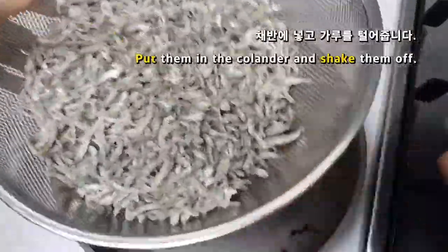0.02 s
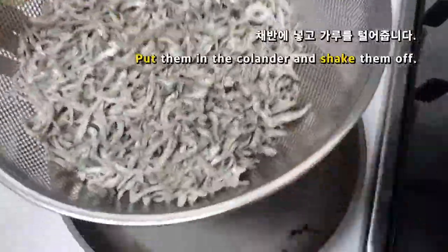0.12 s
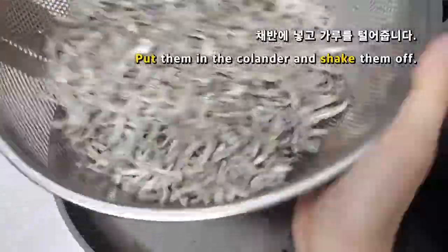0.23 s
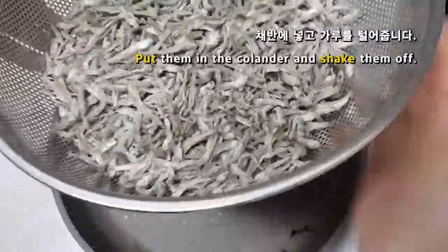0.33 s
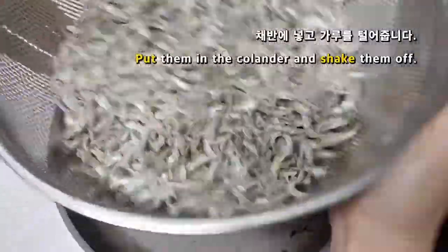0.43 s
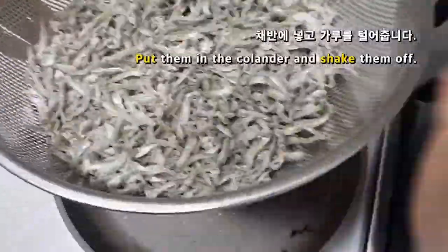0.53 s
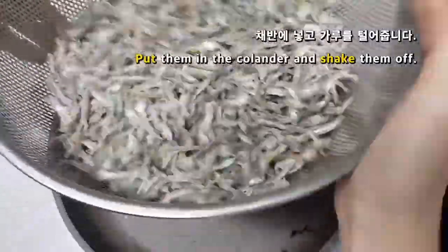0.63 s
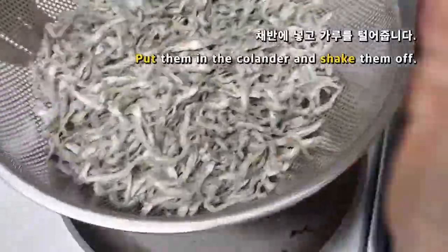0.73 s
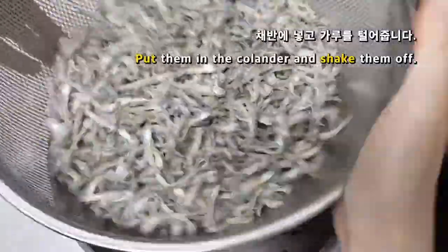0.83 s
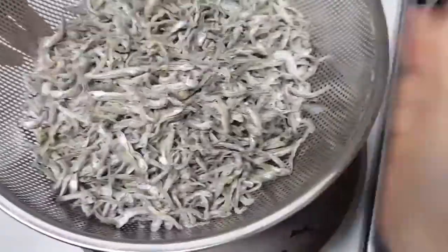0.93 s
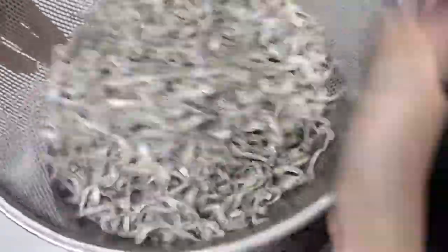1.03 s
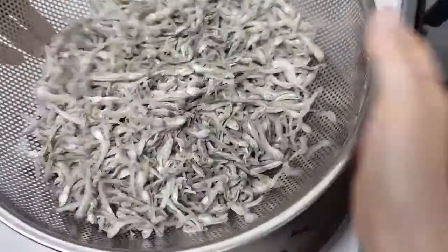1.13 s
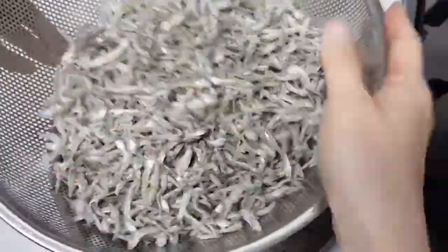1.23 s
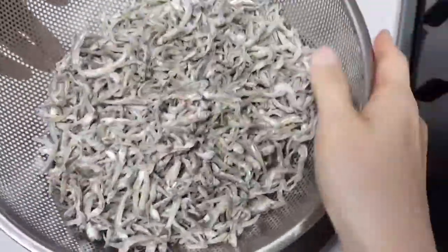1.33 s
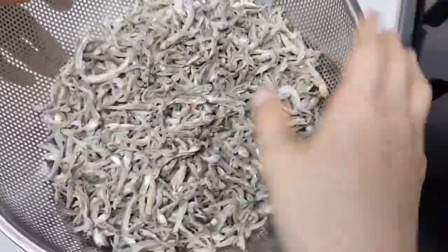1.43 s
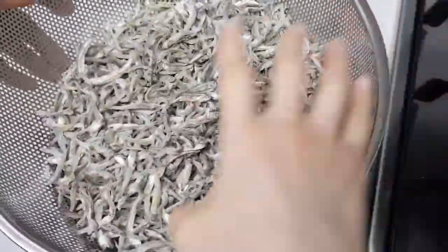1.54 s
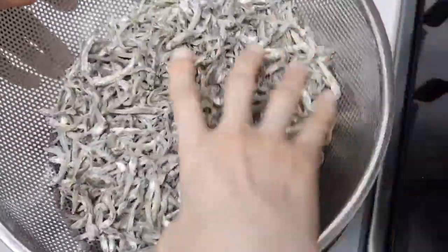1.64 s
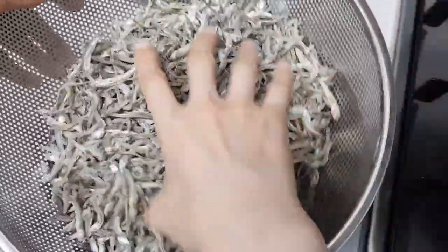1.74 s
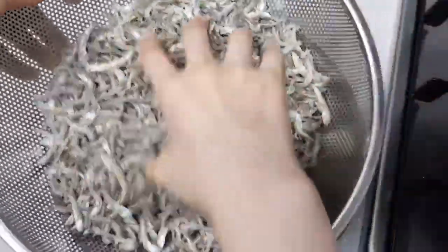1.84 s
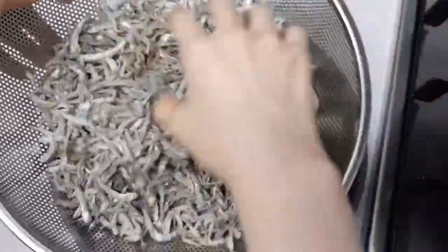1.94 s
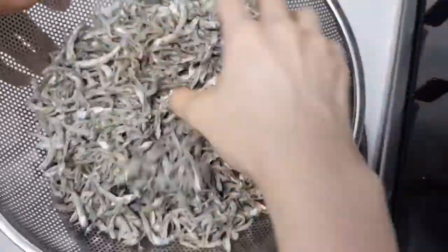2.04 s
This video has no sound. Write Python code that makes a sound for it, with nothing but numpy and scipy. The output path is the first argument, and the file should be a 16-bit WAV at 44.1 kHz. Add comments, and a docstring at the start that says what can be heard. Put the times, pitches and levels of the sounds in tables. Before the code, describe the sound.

Small dried fish are tossed six times in a wire strainer, each a sharp dry crunch with a hollow knock and pattering; the rim clinks a steel bowl, then a hand rustles the heap, close in a kitchen.

```python
"""Small dried fish are tossed six times in a steel mesh strainer, close to a two-port microphone in a kitchen.
Each toss jolts the strainer into a hollow knock, slams the heap into the mesh as dense clicks that ring
the wires, and lets loose fish patter back in dying showers. The rim rings a steel bowl as the strainer
settles, then a hand stirs the heap with a patchy rustle. An appliance rumbles and hums behind.
Clicks and noise are coloured by spectra, struck steel is damped modes, and early echoes and a room tail follow."""
import sys
import numpy as np
from scipy import signal
from scipy.fft import rfft, irfft
from scipy.io import wavfile
from scipy.ndimage import uniform_filter1d

SR = 44100
rng = np.random.default_rng(int(sys.argv[2]) if len(sys.argv) > 2 else 0)


def digitize_waveform(pressure):
    """Quantize a signal to 16-bit integers and store it at the path in sys.argv[1].

    Rows of a 2-D input are taken as channels; values are limited to [-1, 1].
    """
    field = np.atleast_2d(pressure).T
    bounded = np.clip(field, -1, 1)
    quanta = np.round(bounded * 32767).astype(np.int16)
    wavfile.write(sys.argv[1], SR, quanta)


N = 92610
T = np.arange(N) / SR  # s
HZ = np.fft.rfftfreq(N, 1 / SR)

# Levels of the events and the rumble are those ahead of the output gain and the port balance.

# appliance rumble, spectrum shape: frequency_hz, density_db_per_hz
RUMBLE_SPECTRUM = [(20, -12), (50, -4), (75, 1), (115, -2), (160, -17), (190, -11), (260, -20), (380, -20),
                   (550, -28), (740, -22), (1100, -32), (2500, -39), (8000, -47), (11000, -40),
                   (15500, -38), (16500, -60)]
RUMBLE_DB = -64.7

# slow swell added to the hum level: time_s, change_db
HUM_SWELL = [(0, -5), (.9, -1), (1.4, .5), (2.1, .5)]
HUM_HZ, HUM_WAVER_HZ = 785.5, 1.5  # mean pitch and rms wander
HUM_DB, HUM_FLUTTER_DB = -68.3, 1.4  # base level at the left port and rms flutter
HUM_RIGHT_DB = -17  # right port relative to left

# base level of the heap as it shifts and is stirred: time_s, level_db
STIR_LEVEL = [(0, -82), (.18, -80), (.3, -63.5), (.6, -65), (.8, -69), (1.0, -67), (1.2, -63), (1.4, -66),
              (1.46, -72), (1.52, -67), (1.58, -71), (1.66, -62.5), (1.71, -63), (1.81, -55.5),
              (1.87, -56.5), (1.96, -62), (2.03, -66), (2.1, -76)]
# rustle of the heap, spectrum shape: frequency_hz, density_db_per_hz
STIR_SPECTRUM = [(300, -8), (1200, -10), (2700, -15), (3600, -4), (5500, -4), (7400, -2), (8800, -8),
                 (10200, -1), (12500, 2), (15500, -1), (16100, -22)]
STIR_PATCHY_DB = 1.3  # rms unevenness
# a hand rubs on the rim or presses on the heap: peak_s, level_db, rise_s, fall_to_minus_60_db_s
RUBS = [(.29, -62, .04, .5), (.5, -60.5, .04, .5), (.775, -63.5, .03, .3), (1.778, -63, .025, .5)]
# dull rub of the palm, spectrum shape: frequency_hz, density_db_per_hz
PALM_SPECTRUM = [(100, -6), (210, -2), (330, 0), (550, -4), (800, -3), (1300, -3), (1900, -13), (4000, -34)]

# soft bumps of the hands on the strainer: peak_s, level_db, rise_s, fall_to_minus_60_db_s
BUMPS = [(.02, -63, .02, .5), (.31, -56.5, .02, .45), (.6, -62, .03, .3), (.76, -60, .02, .4),
         (1.11, -54.5, .025, .35), (1.29, -58, .03, .3), (1.53, -64, .02, .6)]
# bass of bumps and jolts, spectrum shape: frequency_hz, density_db_per_hz
BASS_SPECTRUM = [(20, -15), (45, -6), (70, 0), (105, -2), (160, -7), (205, -11), (250, -6), (300, -16),
                 (450, -28), (2000, -70)]

# fingertips tap the wires: peak_s, level_db
TAPS = [(.08, -70), (1.286, -39.5), (1.329, -53), (1.479, -46), (2.008, -59)]
# scratch of a fingertip, spectrum shape: frequency_hz, density_db_per_hz
TAP_SPECTRUM = [(1500, -28), (2500, -19), (3100, -7), (4000, -3), (4650, 7), (5600, -4), (7300, 2),
                (8700, -8), (10500, -1), (15500, -3), (16100, -24)]
TAP_RISE_S, TAP_T60_S = .0012, .07

# loose fish patter back onto the heap: peak_s, level_db, rise_s, fall_to_minus_60_db_s
PATTERS = [(.194, -61, .003, .05), (.244, -39.5, .012, .19), (.285, -54.5, .01, .38),
           (.389, -56, .003, .03), (.448, -42, .01, .23), (.488, -43.5, .003, .12), (.501, -42, .005, .16),
           (.613, -45.5, .001, .06), (.668, -41, .01, .23), (.6885, -33, .002, .1),
           (.712, -42.5, .012, .19), (.814, -58, .002, .04), (.8695, -35.5, .002, .15),
           (.895, -45, .01, .18), (.921, -49, .004, .12), (.98, -62, .004, .15), (1.015, -58, .008, .1),
           (1.079, -34.3, .008, .18), (1.091, -37.3, .006, .17), (1.145, -56.5, .01, .3),
           (1.228, -44.3, .005, .14), (1.263, -48, .008, .11), (1.281, -38, .0015, .15),
           (1.329, -49.5, .005, .2), (1.414, -59, .002, .11), (1.615, -55, .002, .13)]
# fish landing on fish, spectrum shape: frequency_hz, density_db_per_hz
FISH_SPECTRUM = [(100, -20), (350, -14), (700, -13), (1200, -15.5), (2200, -12), (3000, -7), (3800, 0),
                 (5000, -3.3), (6800, 1), (7700, -1), (8700, -8), (10200, -1), (12200, 1), (14200, -2),
                 (15500, -2), (16100, -22)]
# modes of the wire mesh: pitch_hz, relative_energy_db, t60_s
MESH_MODES = [(3935, -5, .04), (6280, -8, .02), (6522, -1, .035), (6760, -7, .03), (7047, -4, .025),
              (10650, -7, .012), (11110, -6, .04), (11826, -4, .04), (11995, -4, .035), (13350, -8, .012)]
PATTER_RING_DB = -12  # mesh ring relative to the clicks

# the heap slams into the mesh: peak_s, level_db, rise_s, fall_to_minus_60_db_s, relative_mesh_ring_db
SLAMS = [(.2125, -31, .002, .07, -11), (.2195, -26.5, .003, .1, -11), (.2365, -33, .002, .08, -12),
         (.4175, -17.5, .0005, .018, -9), (.4202, -20.5, .0006, .025, -6), (.4245, -28.5, .003, .115, -7),
         (.4432, -29.5, .0015, .035, -8), (.6345, -33, .002, .05, -6), (.6400, -24.5, .003, .05, 0),
         (.6470, -32.5, .002, .12, -5), (.834, -36, .002, .09, -8), (.8428, -29.5, .0025, .07, -6),
         (1.046, -40, .002, .15, -9), (1.0572, -26.5, .0025, .06, -6), (1.246, -41.3, .007, .12, -1)]
# crunch of the slammed heap, spectrum shape: frequency_hz, density_db_per_hz
SLAM_SPECTRUM = [(200, -30), (900, -18), (2100, -12), (3000, -8), (3800, -3.5), (5200, -3), (6800, 0),
                 (7700, -1.5), (8700, -9), (10500, -1), (12200, 1), (14200, -3), (15500, -2), (16400, -14)]

# the strainer is jolted: time_s, knock_db, clack_rise_s, bass_db, clack_db
JOLTS = [(.2125, -9.5, .0015, -41.5, -40), (.4175, -14, .002, -41.5, -35), (.6335, -15.5, .003, -43.5, -44),
         (.837, -24, .005, -46.5, -53), (1.047, -18, .003, -47, -52.5), (1.225, -28.5, .003, -57.5, -70)]
# low modes of the loaded strainer: pitch_hz, relative_energy_db, t60_s
BODY_MODES = [(255, -10, .12), (350, -8, .07), (555, -8, .07), (670, -5, .045), (718, 0, .1),
              (975, -9, .07)]
# clack of the strainer, spectrum shape: frequency_hz, density_db_per_hz
CLACK_SPECTRUM = [(200, -15), (330, -3), (830, -8), (985, 0), (1170, -11), (1400, 1), (1700, -4),
                  (2100, -8), (2700, -4), (4000, -14), (9000, -45)]
CLACK_T60_S, BASS_T60_S, BASS_RISE_S = .135, .115, .006

# the rim touches the bowl: time_s, level_db
TOUCHES = [(.25, -30), (1.24, -37), (1.284, -29.5), (1.329, -42), (1.615, -49)]
# modes of the steel bowl: pitch_hz, relative_energy_db, t60_s
BOWL_MODES = [(1529, 0, .1), (1650, -3, .07), (2080, -9, .15), (3499, -5, .06)]
CHATTER_DB, CHATTER_RISE_S, CHATTER_T60_S = -26, .002, .08  # drive level relative to the touch
BOWL_RIGHT_DB = 5  # extra gain at the right port

# kitchen decay time: frequency_hz, t60_s
ROOM_T60 = [(100, .35), (1000, .3), (5000, .28), (15000, .2)]
ROOM_DB = -17  # tail relative to the near sound
ECHO_DB, ECHO_SPAN_S = -10, .005  # summed early echoes off the bowl and the counter

# how much louder the left port hears the scene: frequency_hz, lead_db
LEFT_LEAD = [(60, 8.5), (500, 7.5), (800, 10), (2700, 8.5), (4200, 10), (5500, 12), (6500, 17), (7900, 15),
             (8900, 4.5), (10000, 2), (11200, 4), (12300, 7.5), (13500, 11), (15500, 11)]
# left-right likeness of noise at the ports: frequency_hz, likeness_0_to_1
PORT_LIKENESS = [(60, .7), (130, .75), (300, .55), (700, .35), (1400, .05), (4000, 0)]
# phase lag of noise at the right port: frequency_hz, lag_radians
BASS_LAG = [(50, 1.2), (90, 1.0), (200, .6), (700, .5), (2000, 0)]
# the sound shifts towards the right port as the strainer is set down: time_s, right_gain_db
RIGHT_DRIFT = [(1, 0), (1.3, 2), (1.8, .5)]
PORT_LAG_S = .00018  # right port behind left, for single blows
OUTPUT_GAIN_DB, EDGE_HZ = 4.3, 16150


def amp(db):
    """Turns decibels into gain."""
    return 10 ** (np.asarray(db) / 20)


def unit(x):
    """Scales to rms 1."""
    return x / np.sqrt(np.mean(x ** 2) + 1e-20)


def read(points, hz):
    """Reads a table on a log-frequency axis."""
    f, value = np.transpose(points)
    return np.interp(np.log(hz + 1), np.log(f), value)


def over_time(points):
    """Reads a table along the time axis."""
    return np.interp(T, *np.transpose(points))


def burst(peak, db, rise, t60):
    """Swells quickly up to the peak time, then falls exponentially."""
    swell = np.exp(-(np.minimum(T - peak, 0) / rise) ** 2)
    return amp(db - 60 * np.maximum(T - peak, 0) / t60) * swell


def causal(x, db):
    """Filters by a gain curve in minimum phase, so nothing rings ahead of a click."""
    cepstrum = irfft(np.log(amp(db)), N)
    # fold the cepstrum onto positive time
    cepstrum[1:N // 2] *= 2
    cepstrum[N // 2:] = 0
    response = irfft(np.exp(rfft(cepstrum)), N)[:4096]
    return signal.oaconvolve(x, response, "full")[:N]


def colour(pair, points):
    """Gives both channels a spectrum, keeping the power of white input."""
    db = read(points, HZ)
    db = db - 10 * np.log10(np.mean(amp(db) ** 2))
    return np.array([causal(x, db) for x in pair])


def noise():
    """White noise at both ports, more alike in the bass, where the right port lags."""
    left, other = rfft(rng.standard_normal((2, N)))
    same = np.clip(read(PORT_LIKENESS, HZ), 0, 1)
    shared = same * left * np.exp(-1j * read(BASS_LAG, HZ))
    right = shared + np.sqrt(1 - same ** 2) * other
    return irfft(np.array([left, right]), N)


def grains(per_s, spread_db, clump_db, size=40):
    """Tiny collisions of uneven strength in clumps, with a random sign at each port and steady local power."""
    strength = amp(spread_db * np.minimum(rng.exponential(1, N), 3))
    hits = strength * (rng.random(N) < per_s / SR)
    clumps = amp(clump_db * unit(uniform_filter1d(rng.standard_normal(N), size)))
    clicks = hits * clumps * rng.choice([-1., 1.], (2, N))
    local_power = uniform_filter1d((clicks ** 2).mean(0), size=400)
    return clicks / np.sqrt(abs(local_power) + 1e-9)


def ring(pair, modes):
    """Excites a set of damped sine modes, with unit energy in the whole ring."""
    t = T[:SR // 3]
    tone = 0
    for hz, db, t60 in modes:
        mode = amp(-60 * t / t60) * np.sin(2 * np.pi * hz * t)
        tone = tone + amp(db) * unit(mode)
    return signal.oaconvolve(pair, tone[None] / np.linalg.norm(tone))[:, :N]


def blows(rows):
    """One sharp impulse for each time and level; it reaches the right port a little later."""
    force = np.zeros((2, N))
    for s, db, *_ in rows:
        force[0, round(s * SR)] = amp(db)
        force[1, round((s + PORT_LAG_S) * SR)] = amp(db)
    return force


def kitchen():
    """Low rumble of an appliance: noise with a bass-heavy spectrum."""
    return amp(RUMBLE_DB) * colour(noise(), RUMBLE_SPECTRUM)


def hum():
    """A thin motor tone, slowly wavering in pitch and level, mostly on the left."""
    slow = rfft(rng.standard_normal((2, N))) / (1 + (HZ / 8) ** 2)
    waver, flutter = (unit(v) for v in irfft(slow, N))
    phase = 2 * np.pi * np.cumsum(HUM_HZ + HUM_WAVER_HZ * waver) / SR
    tone = np.sqrt(2) * np.sin(phase)  # rms 1
    level = amp(HUM_DB + over_time(HUM_SWELL) + HUM_FLUTTER_DB * flutter)
    return tone * level * amp([[0], [HUM_RIGHT_DB]])


def stir():
    """Uneven fine rustle of the shifting heap from dense clicks, and the dull noisy rub of the hand."""
    spectrum = rfft(rng.standard_normal(N)) / (1 + (HZ / 45) ** 2)
    patches = unit(irfft(spectrum * (HZ > 12), N))
    level = amp(over_time(STIR_LEVEL) + STIR_PATCHY_DB * patches)
    rustle = grains(per_s=8000, spread_db=3.4, clump_db=1.2) * level
    rub = noise() * sum(burst(*row) for row in RUBS)
    return colour(rustle, STIR_SPECTRUM) + colour(rub, PALM_SPECTRUM)


def handling():
    """Dull bass-noise bumps as the hands swing and regrip the strainer."""
    return colour(noise() * sum(burst(*row) for row in BUMPS), BASS_SPECTRUM)


def taps():
    """Short bright scratches of fingertips on the mesh, as bursts of clicks."""
    force = sum(burst(s, db, TAP_RISE_S, TAP_T60_S) for s, db in TAPS)
    clicks = grains(per_s=6000, spread_db=3, clump_db=1.5) * force
    return colour(clicks, TAP_SPECTRUM)


def patter():
    """Loose fish land on one another in dying showers of clicks, and the mesh rings beneath."""
    force = np.linalg.norm([burst(*row) for row in PATTERS], axis=0)
    clicks = grains(per_s=9000, spread_db=3.2, clump_db=1.3) * force
    # the mesh is driven with the ports swapped
    return colour(clicks, FISH_SPECTRUM) + amp(PATTER_RING_DB) * ring(clicks[::-1], MESH_MODES)


def slams():
    """Brittle fish hit the wires in a dense crunch of clicks, and the mesh rings."""
    force = np.array([burst(*row[:4]) for row in SLAMS])
    ring_force = force * amp([row[4] for row in SLAMS])[:, None]
    # separate slams add in power
    crunch = grains(per_s=16000, spread_db=2.3, clump_db=1.4) * np.linalg.norm(force, axis=0)
    wire_hits = grains(per_s=9000, spread_db=2.5, clump_db=1.5) * np.linalg.norm(ring_force, axis=0)
    return colour(crunch, SLAM_SPECTRUM) + ring(wire_hits, MESH_MODES)


def jolts():
    """Each jerk rings the strainer's low modes and adds a noisy clack and a soft bass push."""
    knock = ring(blows(JOLTS), BODY_MODES)
    bass, clack = 0, 0
    for s, _, rise, bass_db, clack_db in JOLTS:
        bass = bass + burst(s + BASS_RISE_S / 2, bass_db, BASS_RISE_S, BASS_T60_S)
        clack = clack + burst(s, clack_db, rise, CLACK_T60_S)
    return knock + colour(noise() * bass, BASS_SPECTRUM) + colour(noise() * clack, CLACK_SPECTRUM)


def bowl():
    """The rim strikes the steel bowl and chatters on it; the bowl's modes ring, weighted to the right."""
    force = sum(burst(s, db + CHATTER_DB, CHATTER_RISE_S, CHATTER_T60_S) for s, db in TOUCHES)
    chatter = noise() * force
    return ring(blows(TOUCHES) + chatter, BOWL_MODES) * amp([[0], [BOWL_RIGHT_DB]])


def echoes(pair, count=12):
    """Close steel surfaces add a handful of quick reflections to the crackle."""
    response = np.zeros((2, SR // 20))
    for side in response:
        at = 8 + (rng.random(count) * ECHO_SPAN_S * SR).astype(int)
        side[at] = amp(ECHO_DB) * rng.choice([-1., 1.], count) / np.sqrt(count)
    response[:, 0] = 1  # direct sound
    return signal.oaconvolve(pair, response / np.linalg.norm(response[0]), axes=1)[:, :N]


def room(x):
    """A short diffuse tail of decaying noise, duller as it dies."""
    hz, t, z = signal.stft(rng.standard_normal((2, SR // 2)), SR, nperseg=256)
    decay = amp(-60 * t / read(ROOM_T60, hz)[:, None])
    onset = np.minimum(t / .006, 1)
    tail = signal.istft(z * decay * onset, SR, nperseg=256)[1]
    return signal.fftconvolve(x, tail / np.linalg.norm(tail[0]), axes=1)[:, :N]


def scene():
    """The strainer in its kitchen, heard close through two unequal microphone ports."""
    crackle = echoes(slams() + patter() + taps())
    near = crackle + jolts() + handling() + bowl() + stir()
    left, right = amp(OUTPUT_GAIN_DB) * (near + amp(ROOM_DB) * room(near) + kitchen())
    right = causal(right, -read(LEFT_LEAD, HZ)) * amp(over_time(RIGHT_DRIFT))
    return np.array([left, right]) + hum()


def record(dry):
    """The recorder's upper band limit, a steep linear-phase low-pass."""
    low_pass = signal.firwin(255, EDGE_HZ, window=("kaiser", 9), fs=SR)
    return signal.oaconvolve(dry, low_pass[None], "same")


dry = scene()
out = record(dry)
digitize_waveform(out)
```